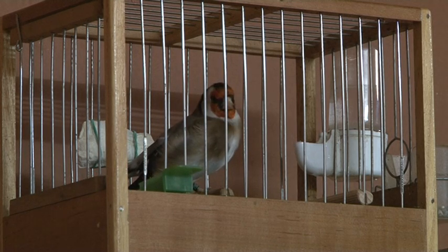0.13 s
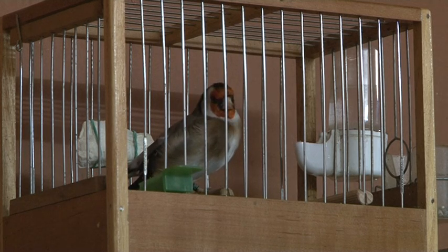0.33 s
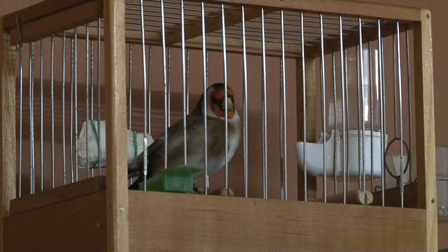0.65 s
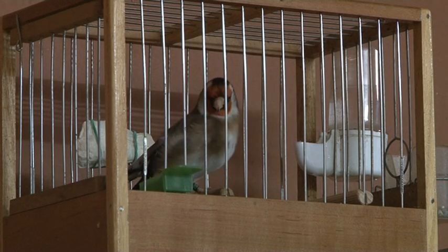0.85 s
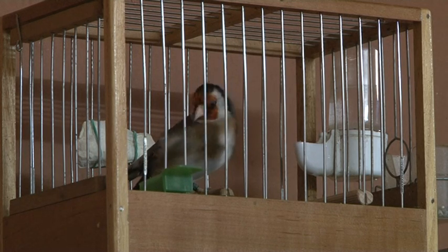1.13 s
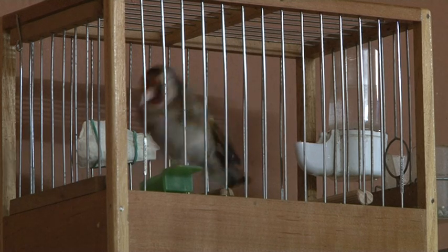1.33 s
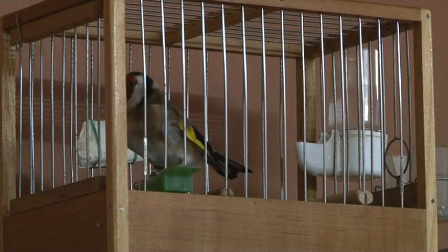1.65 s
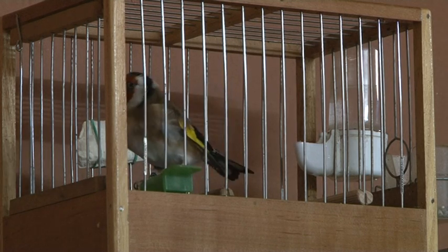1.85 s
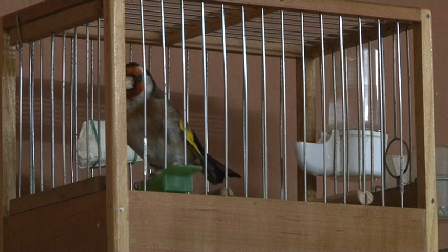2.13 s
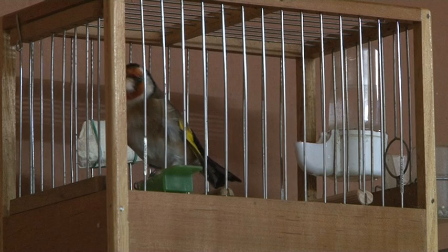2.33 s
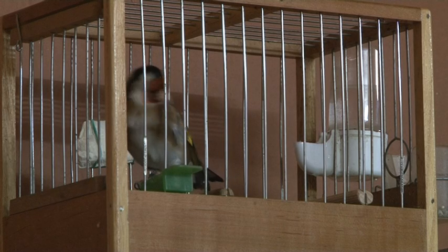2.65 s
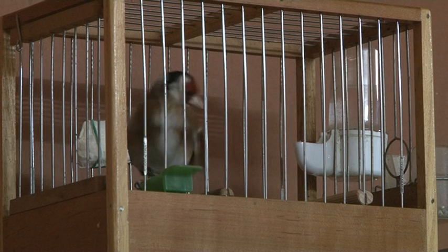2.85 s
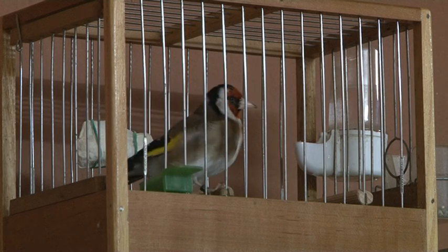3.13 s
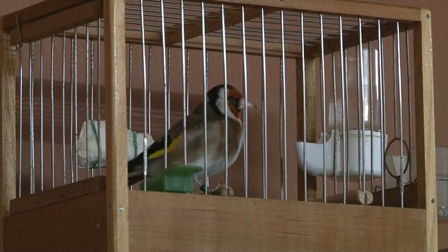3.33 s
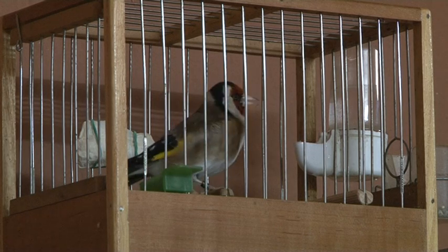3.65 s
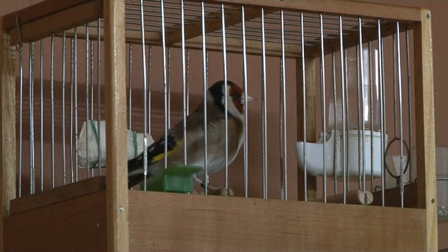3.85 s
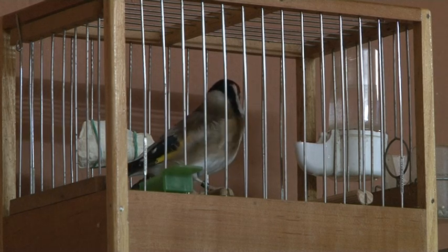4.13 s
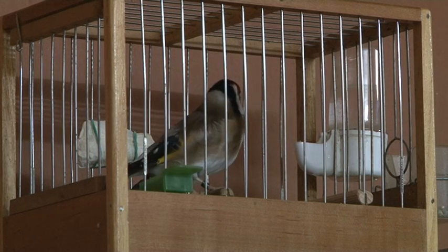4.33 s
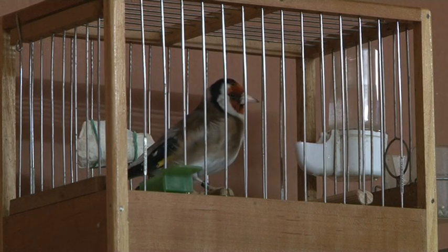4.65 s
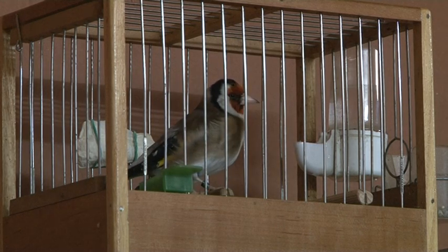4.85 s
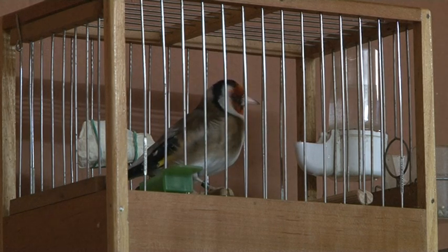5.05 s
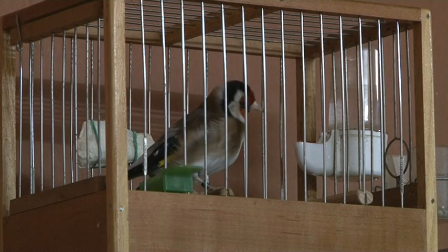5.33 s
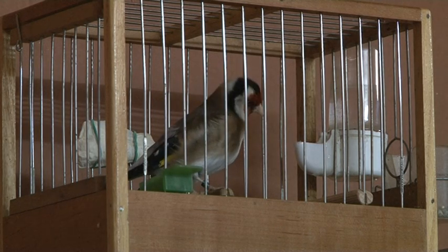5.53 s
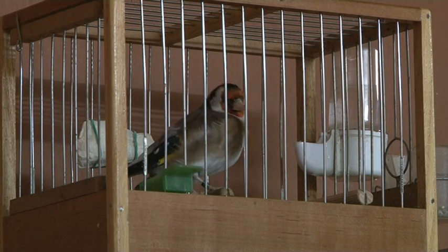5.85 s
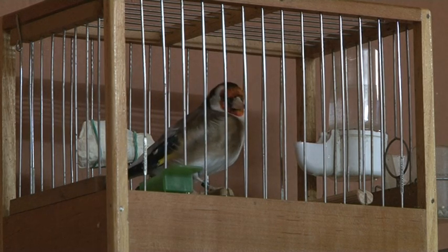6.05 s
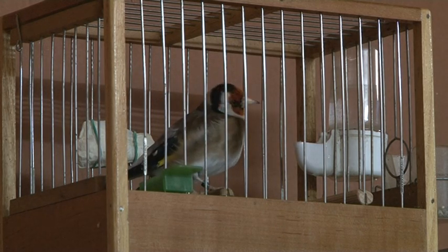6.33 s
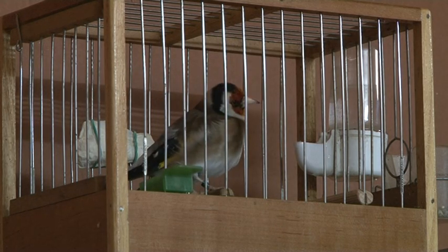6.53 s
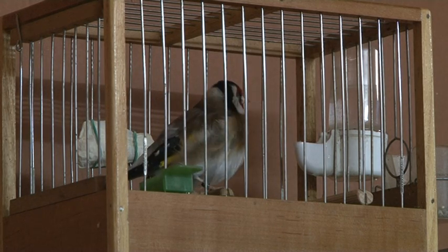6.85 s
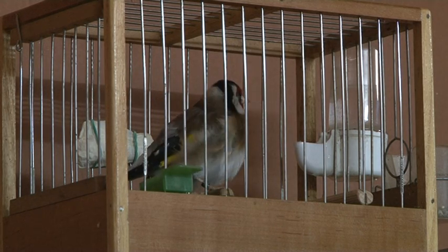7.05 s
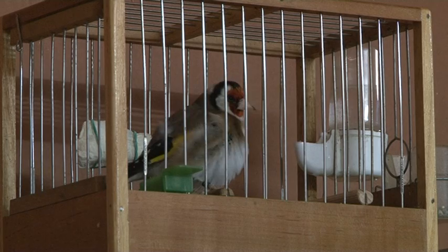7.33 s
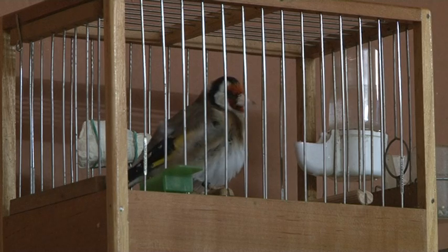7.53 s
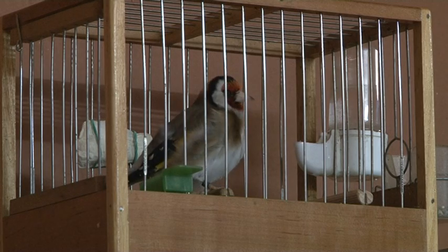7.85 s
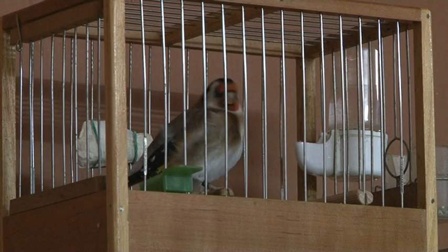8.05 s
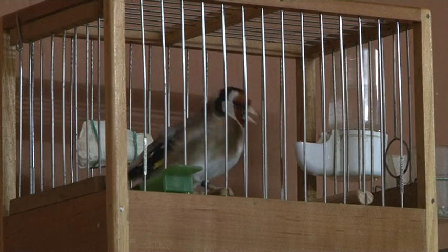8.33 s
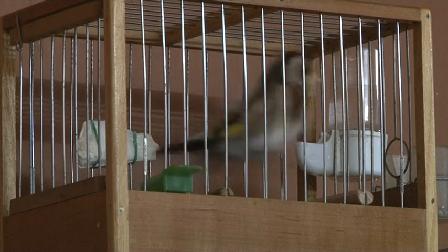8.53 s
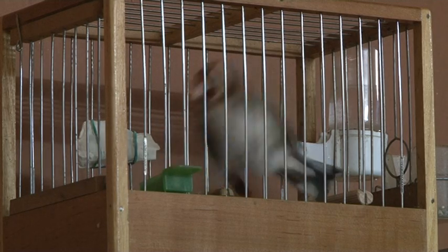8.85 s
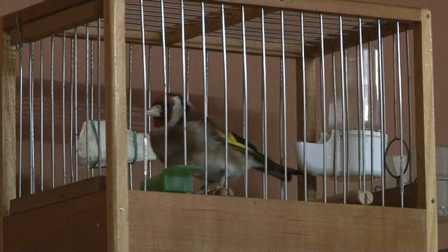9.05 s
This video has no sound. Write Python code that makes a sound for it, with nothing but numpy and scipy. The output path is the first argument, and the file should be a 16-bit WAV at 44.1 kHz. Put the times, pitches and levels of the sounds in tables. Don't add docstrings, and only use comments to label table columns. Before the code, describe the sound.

A small finch in a wooden cage sings in a hard-walled room, a few steps from a stereo microphone. Fast whistles and nasal buzzes come in brief bursts: around two seconds, a climbing refrain near four, further twitters after six and seven and a half, then a loud closing trill and falling whistle. Feet tap softly on the perch, a clock knocks dully each second, and faint hiss, hum and a thin high whine continue.

```python
import sys
import numpy as np
from scipy import signal
from scipy.io import wavfile
from scipy.ndimage import uniform_filter1d

SR = 44100
rng = np.random.default_rng(int(sys.argv[2]) if len(sys.argv) > 2 else 0)


def master(y):
    cut = np.clip(np.atleast_2d(y).T, -1, 1)
    pcm = np.round(cut * 32767)
    wavfile.write(sys.argv[1], SR, pcm.astype(np.int16))


def elevation(decibels):
    levels = np.asarray(decibels, float)
    return 10 ** (levels / 20)


N = 405719
LEAD = SR // 2
LONGEST = 6000


def song():
    out = np.zeros(N + LEAD)
    for sing in (closing_glide, openers, pips, rises, falls, trill, duets, buzzes):
        sing(out)
    high_pass = signal.butter(4, 1350, "high", fs=SR, output="sos")
    return signal.sosfilt(high_pass, out)


OVERTONES = [0, -15, -18]


def whistle(length, start_hz, end_hz, db, over_db, settle, plunge, lean):
    seconds = abs(length)
    u = np.arange(round(seconds * SR)) / (seconds * SR)
    glide = end_hz + (start_hz - end_hz) * (1 - u) ** settle
    hz = glide * (1 - plunge * u ** 8)
    unsteady_hz = .09 * abs(start_hz - end_hz)
    z = spin(hz + unsteady_hz * wobble(count=len(u), size=90))
    tone = z
    for partial, partial_db in enumerate(OVERTONES, start=2):
        audible = partial * hz < .4 * SR
        tone = tone + elevation(over_db + partial_db) * z ** partial * audible
    grit = chance(len(u))
    breath = elevation(-21) * resonate(resonate(grit, hz, 1600), hz, 1600)
    breath += elevation(over_db - 11) * resonate(resonate(grit, 2.3 * hz, 4000), 2.3 * hz, 4000)
    flutter_db = .8 * wobble(count=len(u), size=120)
    swell = np.sin(np.pi * u ** lean) ** 1.5
    return elevation(db + flutter_db) * (tone.real + breath) * swell


def whistles(out, rows, settle, plunge=0, lean=1, reed_db=0):
    for s, length, start_hz, end_hz, db in rows:
        octaves = np.log2(end_hz / 3300)
        over_db = -19 - 14.5 * octaves - .35 * (db + 28.5) + reed_db
        add(out, s, whistle(length, start_hz, end_hz, db, over_db, settle, plunge, lean))


# start_s, length_s, start_hz, end_hz, peak_db
CLOSING_GLIDE = [(8.745, .09, 5400, 4750, -13)]


def closing_glide(out):
    whistles(out, CLOSING_GLIDE, settle=1.1, lean=.7)


# start_s, length_s, start_hz, end_hz, peak_db
OPENERS = [(1.793, .013, 2040, 3120, -40), (3.613, .046, 2450, 2890, -25), (5.98, .0205, 2340, 2800, -33),
           (7.51, .026, 2050, 2500, -34)]


def openers(out):
    whistles(out, OPENERS, settle=3.5, reed_db=4)


# start_s, length_s, start_hz, end_hz, peak_db
PIPS = [(-.22, 0.026, 2300, 3300, -19), (1.906, .018, 2180, 2930, -33), (2.064, 0.0073, 2220, 2580, -27),
        (2.09, .014, 3230, 3124, -26), (2.213, 0.0076, 2320, 2810, -22.5), (6.153, .006, 2140, 2580, -37.5),
        (6.172, .015, 2030, 2500, -34), (6.205, .01, 2650, 2690, -40), (6.42, 0.0073, 2465, 2820, -28.5),
        (6.462, .05, 2750, 3400, -27), (7.595, .024, 2685, 3300, -22.5)]


def pips(out):
    whistles(out, PIPS, settle=2.1)


# start_s, length_s, start_hz, end_hz, peak_db
TWEETS = [(-.14, .03, 4320, 5840, -25), (2.042, .016, 3230, 3800, -27), (2.06, .0079, 4550, 5150, -14.5),
          (2.272, .018, 5090, 5387, -17), (6.297, .012, 3893, 4350, -28.5), (6.372, .027, 4746, 5300, -18),
          (6.438, .018, 3576, 4160, -21.5), (6.475, .06, 5900, 6810, -39.5),
          (6.521, .028, 6350, 6607, -16.5), (7.572, .007, 4760, 5430, -21),
          (7.684, .022, 7020, 7740, -24.5), (7.686, .0079, 3960, 4080, -36),
          (7.7, .0056, 4450, 4435, -27.5), (7.708, .024, 3290, 3930, -19.5),
          (7.882, .011, 5290, 5150, -35.5), (7.893, .035, 4704, 4944, -22.5)]
# start_s, length_s, whip_db, cap_db
WHIPS = [(-.2, .04, -21.5, -27), (1.798, .026, -27.5, -37.5), (1.999, 0.018, -22, -28.5),
         (3.712, 0.014, -21, -17), (6.074, 0.022, -22, -48)]
# delay_s, length_s, start_hz, end_hz, level_db
LADDER = [(0, 0.038, 2428, 3385, -27), (.043, 0.021, 3024, 3919, -18), (.058, .019, 3610, 4260, -19)]
# start_s, pitch_factor, level_db, top_step_db re the rest
LADDERS = [(3.815, 1.003, -0.5, 3.5), (4.045, 1.002, 0, -1), (4.28, .999, 0.5, -3), (4.534, 0.99, 0.56, 1)]


def rises(out):
    rows = list(TWEETS)
    for s, length, whip_db, cap_db in WHIPS:
        rows.append((s, length, 2980, 4700, whip_db))
        rows.append((s + .74 * length, .014, 4530, 4980, cap_db))
    for s, pitch, level_db, top_db in LADDERS:
        for k, (delay, length, start_hz, end_hz, step_db) in enumerate(LADDER):
            db = level_db + step_db + top_db * (k == 2)
            rows.append((s + delay, length, pitch * start_hz, pitch * end_hz, db))
    whistles(out, rows, settle=1.9)


# start_s, length_s, start_hz, end_hz,
# peak_db
FALLS = [(2.284, .009, 5100, 4300, -14), (2.289, .014, 4330, 4270, -17), (6.235, .088, 1300, 2250, -44),
         (6.346, .023, 5850, 5750, -20), (7.912, .024, 2800, 2450, -31)]
# start_s, length_s, start_hz, end_hz, peak_db
PEAL = (2.241, .028, 6050, 5880, -7)
# start_s, length_s, start_hz, peak_db
TRILL = [(8.455, 0.016, 5585, -10.5), (8.532, 0.031, 5090, -15.5), (8.602, .033, 5145, -17.5),
         (8.679, 0.031, 5150, -15.5)]


def falls(out):
    upper_voice = [(s, .019, 6500, 5670, -30) for s, *_ in TRILL]
    whistles(out, FALLS + [PEAL] + upper_voice, settle=1.1)


def trill(out):
    rows = [(s, length, start_hz, 4330, db) for s, length, start_hz, db in TRILL]
    whistles(out, rows, settle=1.25, plunge=.2, lean=.6)


# start_s, lower_hz, upper_hz, lower_db, upper_db
DUETS = [
    [(3.745, 5430, 5900, -50, -18), (3.765, 5770, 6424, -10.5, -16), (3.782, 6330, 6350, -17, -18)],
    [(8.373, 6180, 6104, -1.5, -16.5), (8.382, 5585, 6820, -8.5, -15.5), (8.398, 5500, 6887, -15.5, -21),
     (8.401, 5140, 6630, -14, -13.5), (8.41, 5130, 6600, -28, -22.5)],
]
# delay_s, lower_hz, upper_hz, lower_db, upper_db
PAIR = [(0, 5500, 5950, -22, -24), (.014, 5777, 6145, -15.5, -18), (.031, 5310, 6140, -12.5, -12.5)]
# start_s, level_db, upper_db re usual
PAIRS = [(3.972, 0, 0.7), (4.203, 0.5, -2.5), (4.46, 0.6, -1.5)]


def duets(out):
    pairs = [np.add(PAIR, [s, 0, 0, db, db + upper_db]) for s, db, upper_db in PAIRS]
    for rows in DUETS + pairs:
        add(out, *duet(rows))


def duet(rows):
    s, (low_hz, high_hz, low_db, high_db), edge = columns(rows)
    low = elevation(low_db) * edge * spin(low_hz)
    high = elevation(high_db) * edge * spin(high_hz)
    differences = elevation(3.0) * (low * low * high.conj() + high * high * low.conj())
    sums = elevation(-18.5) * (low * low + low * high + high * high)
    return s, (low + high + differences + sums).real


# start_s, length_s, first_rate_hz, final_rate_hz, level_db
BUZZES = [(-.16, 0.07, 800, 920, -33), (2.021, .08, 760, 1065, -29), (2.16, .062, 810, 910, -28),
          (6.232, .092, 630, 1120, -35), (7.556, .062, 860, 1130, -31.5), (7.652, .068, 780, 1230, -30)]
CROAK = (7.845, .05, 860, 1030, -34)


def buzzes(out):
    slides = [slide(*row, throat_hz=6100) for row in BUZZES]
    slides.append(slide(*CROAK, throat_hz=3600))
    for rows in slides:
        add(out, *buzz(rows))


def slide(s, length, first_hz, final_hz, db, throat_hz):
    u = np.linspace(0, 1, num=6)
    rate_hz = final_hz + (first_hz - final_hz) * (1 - u) ** 1.2
    sinking_hz = throat_hz + (3200 - throat_hz) * u ** .9
    roughness = .33 + 0 * u
    return np.transpose([s + length * u, rate_hz, sinking_hz, db + 4 * u, roughness])


def buzz(rows):
    s, (hz, throat_hz, db, rough), edge = columns(rows)
    rough = np.clip(rough + .08, 0, 1)
    z = spin(hz * (1 + .026 * wobble(count=len(hz), size=80)))
    pulses = sum((z ** k).real for k in range(3, 12))
    puffs = evened((0.78 + z.real) * chance(len(hz)))
    throat = (1 - rough) * evened(pulses) + rough * puffs
    for _ in range(3):
        throat = resonate(throat, throat_hz, 3000)
    hiss = elevation(-19.5) * resonate(puffs, 7000, 8000)
    return s, elevation(db) * (evened(throat) + hiss) * edge


def columns(rows):
    s, *values = np.transpose(rows)
    t = np.arange(s[0], s[-1], 1 / SR)
    return s[0], [np.interp(t, s, v) for v in values], signal.windows.tukey(len(t), .7)


def add(mix, s, sound):
    part = mix[..., LEAD + round(s * SR):][..., :sound.shape[-1]]
    part += sound[..., :part.shape[-1]]


def spin(hz):
    return np.exp(2j * np.pi * np.cumsum(hz) / SR)


def resonate(x, hz, width):
    turn = spin(hz * np.ones(len(x)))
    r = np.exp(-np.pi * width / SR)
    return 2 * (turn * signal.lfilter([1 - r], [1, -r], x / turn)).real


def evened(x):
    return x / np.sqrt(np.mean(abs(x) ** 2) + 1e-20)


def chance(count):
    return rng.standard_normal(LONGEST)[:count]


def wobble(count, size):
    smooth = uniform_filter1d(uniform_filter1d(chance(LONGEST), size), size)
    return evened(smooth)[:count]


def read(points, hz):
    f, value = np.transpose(points)
    return np.interp(np.log(hz + 1), np.log(f + 1), value)


# start_s, peak_db, ring_hz, scuff_db re ring
TAPS = [(.299, -84, 820, -7.5), (.589, -67, 860, -6), (.919, -70, 1250, 14.5), (1.019, -67, 840, 3),
        (1.199, -65, 807, 2), (1.262, -53, 1670, -3), (1.424, -58.5, 1380, 9), (2.999, -62, 640, 11),
        (3.077, -51.5, 890, 2.5), (3.254, -58.5, 1600, -3), (3.511, -49, 936, -8.5), (3.703, -56, 900, -9),
        (4.916, -61, 934, 10.5), (4.997, -43.5, 952, -10.5), (5.26, -58, 1610, -8), (5.543, -57, 942, -24),
        (5.749, -66, 966, 16), (5.872, -49.5, 1016, 0), (5.922, -46, 1004, 3.5), (6.793, -61, 938, 0),
        (7.261, -58.5, 1150, 4.5), (7.403, -57, 1014, 4), (8.138, -50.5, 973, 1.5), (8.279, -59, 930, 10.5),
        (8.659, -56, 980, 6.5), (9.029, -73, 1430, 19)]


def taps():
    out = np.zeros((2, N + LEAD))
    for s, db, ring_hz, scuff_db in TAPS:
        add(out, s - .008, knock(db, ring_hz, scuff_db))
    return out


def clock():
    out = np.zeros((2, N + LEAD))
    for second in range(9):
        add(out, .43 + second - .008, knock(db=-59.5, ring_hz=630, scuff_db=-18.5))
    return out


def knock(db, ring_hz, scuff_db):
    t = np.arange(SR // 8) / SR
    grit = rng.standard_normal(len(t))
    touch = t / .011 * np.exp(1 - t / .011)
    width = .14 * ring_hz
    wood = resonate(resonate(grit * touch, ring_hz, width), ring_hz, width)
    wire = resonate(resonate(grit * touch, 2.15 * ring_hz, 300), 2.15 * ring_hz, 300)
    ring = wood + elevation(-6.5) * (ring_hz > 1400) * wire
    band = signal.butter(2, [.4 * 3300, 1.9 * 3300], "band", fs=SR, output="sos")
    scuff = elevation(scuff_db) * signal.sosfilt(band, grit) * touch
    pan = elevation(np.array([[-.75], [.75]]))
    return elevation(db - 4.0) * (ring / abs(wood).max() + scuff) * pan


# pitch_hz, t60_s
WALLS = [(2000, 0.46), (4000, 0.38), (6000, 0.37), (9000, 0.22), (14000, 0.073)]
# pitch_hz, level_db
WET = [(1000, 1), (3000, 1), (4800, .5), (6000, -4), (12000, -5)]
# delay_s, level_db
ECHOES = [(.0155, -18), (.0225, -13), (.031, -17), (.045, -15)]


def reflections():
    spacing = 20
    kicks = np.zeros((2, SR))
    at = np.arange(100, SR - 20, spacing) + rng.integers(0, spacing, (2, (SR - 101) // spacing))
    np.put_along_axis(kicks, at, rng.choice([-1., 1.], at.shape), 1)
    hz, t, z = signal.stft(kicks, SR, nperseg=256)
    ring = elevation(-50 - 60 * t / 1.3)
    build = np.clip(t / .008, 0, 1)
    decay = (elevation(-60 * t / read(WALLS, hz)[:, None]) + ring) * build
    energy = (decay ** 2).sum(1, keepdims=True) * 128 / spacing
    shaped = z * decay * elevation(read(WET, hz))[:, None] / np.sqrt(energy)
    mid, side = signal.istft(shaped, SR, nperseg=256)[1][:, :SR]
    side = elevation(-5.5) * side
    for delay, db in ECHOES:
        mid[round(delay * SR)] += elevation(db)
    mid[0] = 1
    return np.array([mid + side, mid - side])


def room(x):
    return signal.fftconvolve(x, reflections(), axes=1)[:, LEAD:LEAD + N]


# time_s, level_db
WHINE = [(0, -66.5), (2, -65), (2.7, -66), (5.7, -63), (8.6, -64), (9.2, -70)]


def whine():
    line_hz, mains_hz = 15624.7, 50
    t = np.arange(N) / SR
    turn = 2 * np.pi * t
    level = elevation(np.interp(t, *np.transpose(WHINE)) + 5.5)
    ripple = 1 + .45 * np.cos(mains_hz * turn) + .12 * np.cos(2 * mains_hz * turn)
    step, lean_db = .62, -1.6
    sides = np.array([[1], [-1]])
    return level * ripple * np.sin(line_hz * turn + step * sides) * elevation(lean_db * sides)


# pitch_hz, width_hz, level_db
HUMS = [(98.4, 3.4, -85), (200, 4.1, -80.5), (339.7, 12, -76.5), (398, 7.6, -75), (490, 6, -84),
        (601, 6, -85), (841, 2.7, -80.5), (1630, 3, -89), (1883, 33, -80.5), (3250, 5, -77.5)]


def hums():
    stir = rng.standard_normal(N) + 1j * rng.standard_normal(N)
    return sum(hum(*row, np.roll(stir, k * SR)) for k, row in enumerate(HUMS))


def hum(hz, width, db, stir):
    r = np.exp(-np.pi * width / SR)
    fringe = signal.lfilter([1], [1, -2 * r, r * r], stir)
    return elevation(db) * (spin(np.full(N, hz)) * (1 + .35 * evened(fringe))).real


# pitch_hz, density_db per Hz
AIR = [(20, -17), (50, -15.5), (78, -25), (125, -20), (160, -11), (270, -7), (310, -6), (394, -3),
       (800, -10), (1100, -10.5), (3200, -17), (6000, -22.5), (11000, -28.5), (15000, -35)]
# pitch_hz, likeness
SAME = [(60, 0.4), (180, 0.8), (550, 0.47), (1650, 0.018), (4970, 0.67), (15000, 0.09)]


def air():
    frames, hz = N // 512 + 5, np.fft.rfftfreq(2048, 1 / SR)
    a, b, c, d, patches = rng.standard_normal((frames, 1025, 5)).T
    patches = evened(uniform_filter1d(uniform_filter1d(patches, 16, 0), 8, 1))
    same = np.clip(read(SAME, hz), -1, 1)[:, None]
    left, other = a + 1j * b, c + 1j * d
    z = np.array([left, same * left + np.sqrt(1 - same ** 2) * other])
    z *= elevation(read(AIR, hz)[:, None] + 0.53 * patches)
    noise = signal.istft(z, nperseg=2048, noverlap=1536)[1][:, :N]
    return elevation(-65.5) * evened(noise)


def scene():
    bird = song() * elevation(np.array([[-.15], [.15]]))
    background = (air() + hums()) * elevation(np.array([[-.8], [.8]]))
    return room(bird + taps() + clock()) + background + whine()


def roll_off(x):
    return signal.sosfilt(signal.butter(12, 15900, fs=SR, output="sos"), x)


def record(dry):
    fade = elevation(np.interp(np.arange(N) / SR, [8.9, 9.2], [0, -6]))
    return roll_off(dry * fade)


dry = scene()
out = record(dry)
master(out)
```